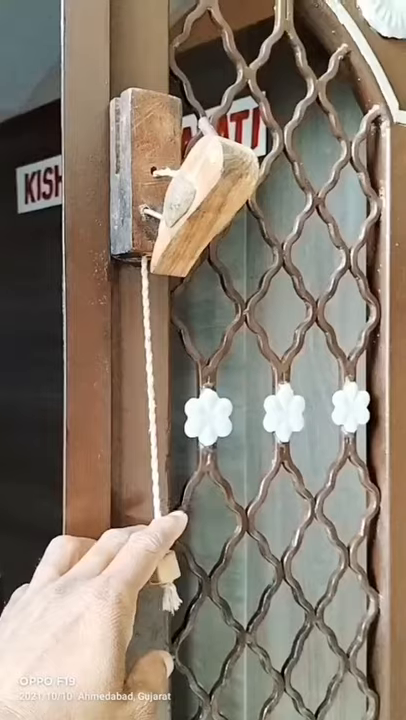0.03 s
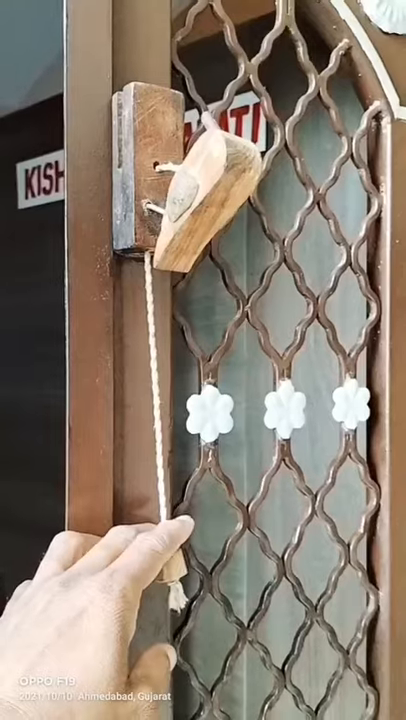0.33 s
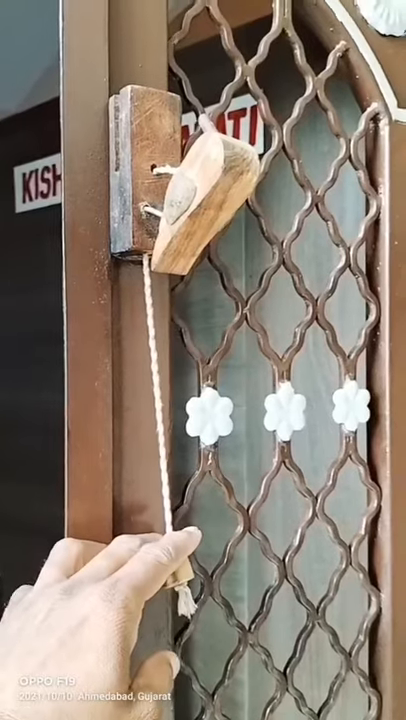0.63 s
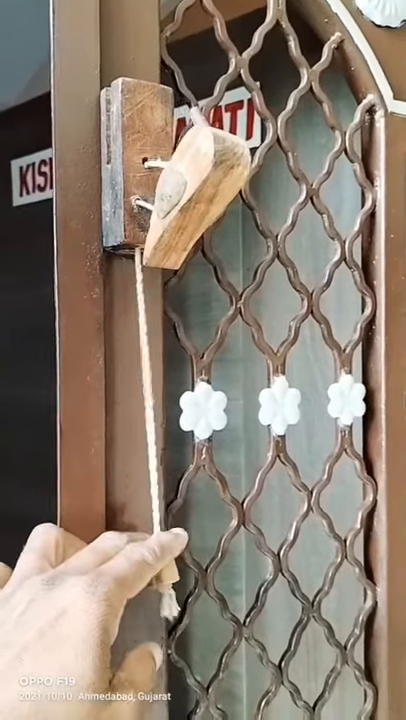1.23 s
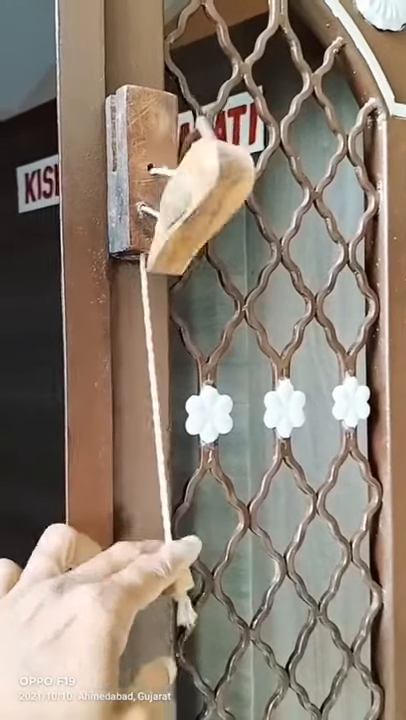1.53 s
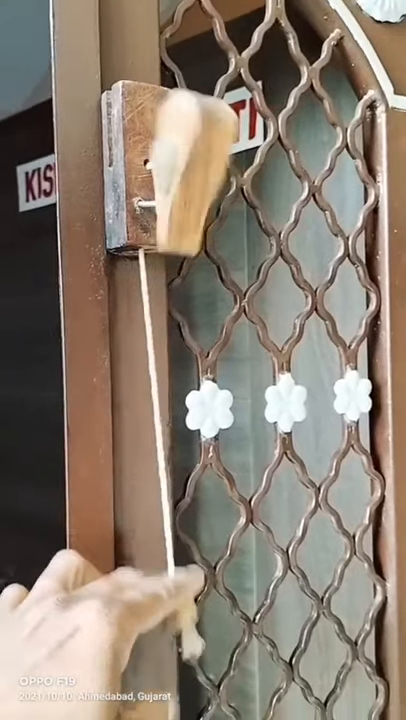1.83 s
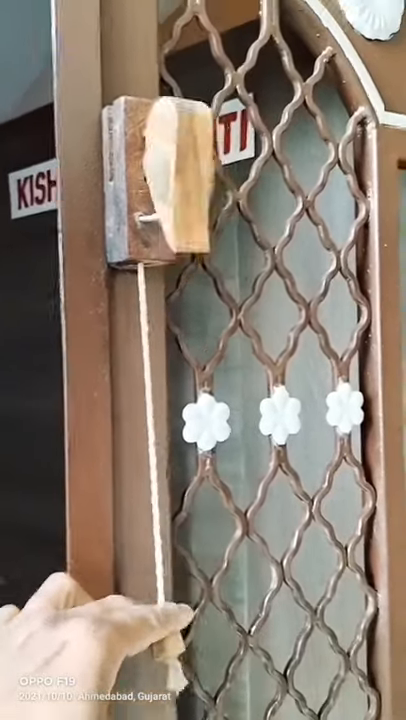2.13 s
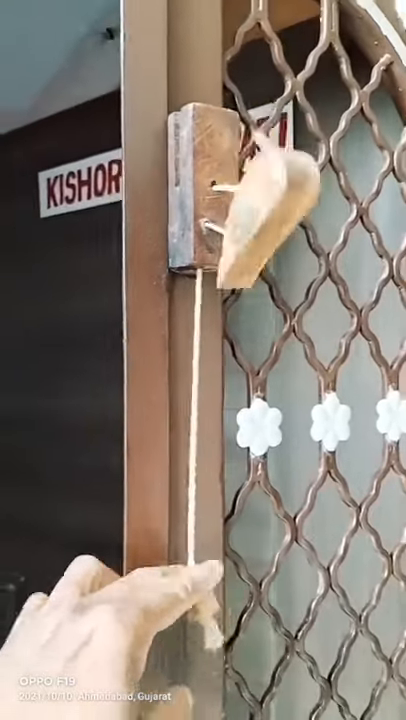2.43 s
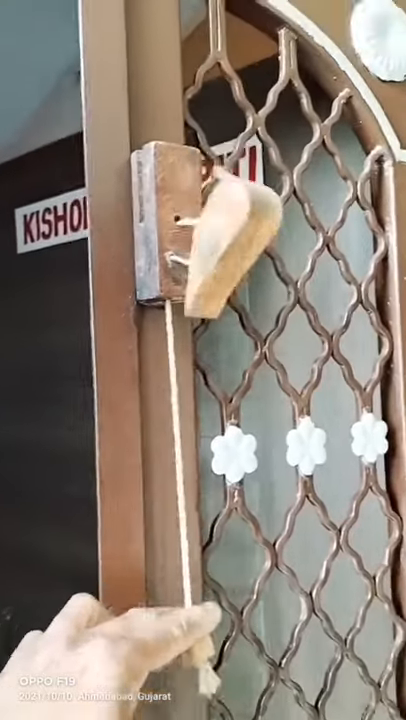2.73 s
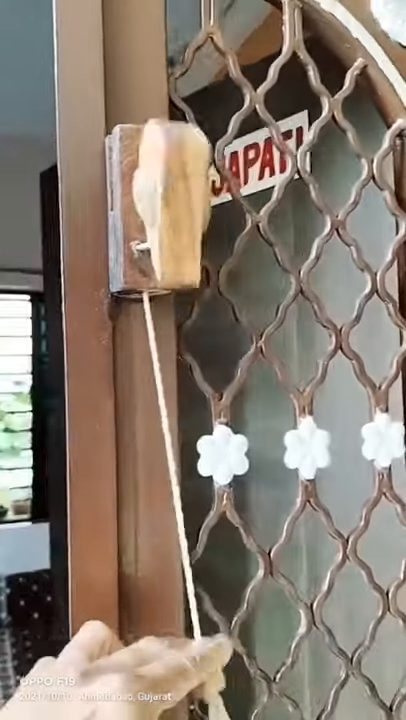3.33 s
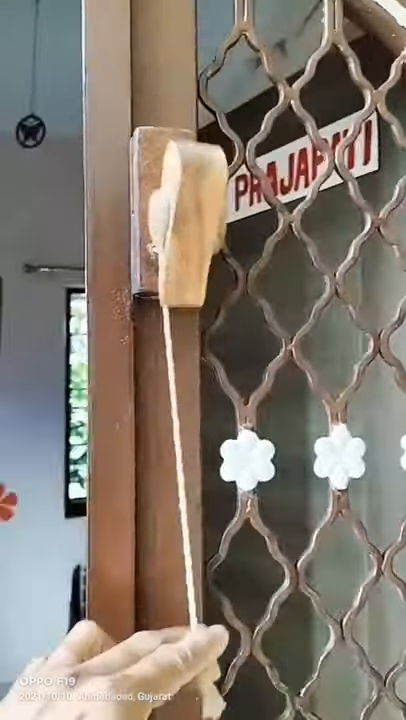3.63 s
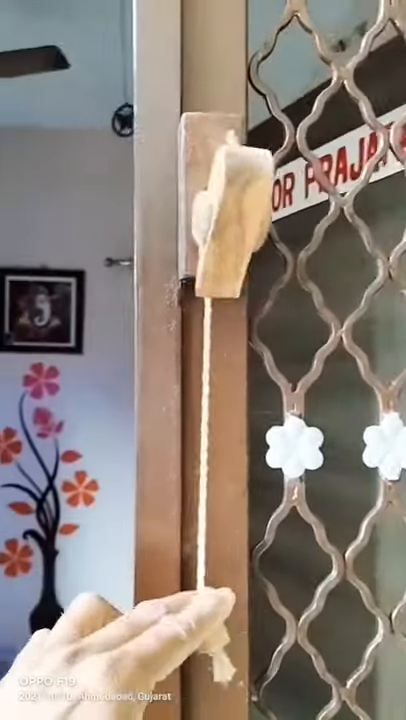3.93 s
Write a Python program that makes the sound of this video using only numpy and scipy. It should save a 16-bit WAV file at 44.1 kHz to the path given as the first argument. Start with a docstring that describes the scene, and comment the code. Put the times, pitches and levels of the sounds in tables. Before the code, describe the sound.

Sharp, echoing clacks of a wooden knocker repeat steadily against its block on a door.

```python
"""On a bare, echoing landing, a small wooden knocker pulled by a cord clacks eleven times
against its block on a door frame. Each blow gives a hard snap, sets the wood and the frame
ringing, and bounces off the walls. Behind it are a few faint chirps and the wash of distant
traffic. A phone close by picks it all up and rounds off the loudest peaks."""
import sys
import numpy as np
from scipy import signal
from scipy.fft import rfft, irfft
from scipy.io import wavfile
from scipy.ndimage import uniform_filter1d, minimum_filter1d

SR = 44100
rng = np.random.default_rng(int(sys.argv[2]) if len(sys.argv) > 2 else 0)


def unload_audio(sound):
    """Save the sound as a 16-bit wav file, at the path given as the first command line argument."""
    columns = np.transpose(np.atleast_2d(sound))
    # keep every value between -1 and 1, then stretch to whole-number steps
    steps = np.round(np.clip(columns, -1, 1) * 32767)
    wavfile.write(sys.argv[1], SR, steps.astype(np.int16))


N = 176400


def knocker():
    """Each blow snaps, ticks and rings the wood; the echoes shift as the phone moves."""
    # One row a blow; body means the ringing wood and its echoes, hollow the block's own note.
    # start_s, body_db, snap_db, bright_db_per_octave, hollow_db, tick_db, low_thud_db, damping_db_per_s
    blows = [(1.2546, -2.5, -4, 0.5, 5, -7, -12, 36), (1.5438, -1, 0.5, 0.5, 0, -3, 5, 4),
             (1.7861, 0, 1.5, 0, 0, 5, -1, 2), (2.0200, -1, 2.5, 1.2, 1.5, 2, 10, -2),
             (2.2290, 0, -0.5, 0.2, -1.5, 0.5, 0, 26), (2.4474, 1.5, -1, -1, -2.5, 0, -7, 3),
             (2.7091, 1, 0, 0, -1, -1.5, 6, 6), (2.9710, 2, 3, -0.5, -1, 6, 1, 21.5),
             (3.2698, -1, -1.5, 0.5, 1.5, -2.5, -2, -12), (3.5889, -3.5, 2, 1.5, 1.5, -1.5, -5, -16),
             (3.9422, -3.5, 3.5, 1.2, 6, 0.5, 2, 3)]
    t = np.arange(32768) / SR
    hz = np.fft.rfftfreq(len(t), 1 / SR)
    octaves = np.log2(np.clip(hz, 800, 5000) / 2000)
    block_hz, block_width_hz = 1027, 310
    block_note = 1 / (1 + ((hz - block_hz) / block_width_hz) ** 2)
    spots, near_samples = 4, 16384  # the phone passes four spots, each with its own echoes
    echoes = landing_echo(t, spots)
    echoes[:, :near_samples] += near_echoes(t[:near_samples], spots)
    wood, snap, ticks = ringing_wood(t), contact_snap(t), edge_ticks(len(blows))
    # A brief low thud in the phone's sound with each blow.
    low_thud = ring(t, pitch_hz=48, level_db=-50, fade_s=0.083)
    places = np.linspace(0, spots - 1, len(blows))
    out = np.zeros(N)
    for blow, place, tick in zip(blows, places, ticks):
        start_s, body_db, snap_db, bright, hollow_db, tick_db, low_thud_db, damping = blow
        nearness = np.sqrt(np.maximum(0, 1 - abs(np.arange(spots) - place)))
        note_gains = undb(rng.standard_normal(len(wood)))  # each note varies by about 1 dB
        body = note_gains @ wood + nearness @ echoes
        tone = undb(body_db + bright * octaves + hollow_db * block_note)
        body = taper(irfft(rfft(body) * tone)) * undb(-damping * t)
        add(out, start_s, undb(snap_db) * snap + undb(low_thud_db) * low_thud + body)
        add(out, start_s, undb(tick_db) * tick)
    return out


def ringing_wood(t):
    """Struck wood rings at its own set of notes: one row each, starting at slightly different times."""
    # Notes of the knocker, block and frame: pitch_hz, level_db, fade_s
    notes = [(491.7, -33, 0.45), (720, -32, 0.217), (789, -30.5, 0.3), (955.2, -23.5, 0.26),
             (1010, -20, .24), (1065, -26, 0.29), (1102, -20, 0.18), (1210, -29, 0.31), (1274, -39.5, 0.61),
             (1519.6, -22.5, 0.21), (1735, -14.5, 0.12), (2470, -20.5, 0.2), (2455, -21.5, 0.1),
             (2832, -22.5, 0.31), (3057, -25, 0.17), (3620, -16, 0.067), (3790, -30.5, 0.45),
             (4180, -23, 0.26)]
    rise_s = 0.005017
    delays_s = rng.uniform(0, rise_s, len(notes))
    return np.array([ring(t - delay, *note) * rise(t - delay, rise_s)
                     for note, delay in zip(notes, delays_s)])


def contact_snap(t):
    """The hit itself, heard directly: a few notes that die almost at once."""
    # Notes of the snap: pitch_hz, level_db, fade_s
    notes = [(4070, 6, 0.0083), (3770, -32, 0.0067), (2644, -14, 0.0067), (1010, -17, 0.041)]
    return sum(ring(t, *note) for note in notes) * rise(t, rise_s=0.0011)


def edge_ticks(count):
    """Hard edges meet in a tiny burst of noise, one row for each blow."""
    # Tone of the tick: pitch_hz, level_db
    tone = [(2000, 8), (5500, -5), (8000, -4), (10000, -4.5), (11300, 1), (12200, 3.5), (13000, -13),
            (14000, -5)]
    t = np.arange(4096) / SR
    bursts = rng.standard_normal((count, len(t))) * fade(t, fade_s=0.0066)
    return undb(-19) * colour(bursts, tone)


def near_echoes(t, spots):
    """The door and near walls throw back a crowd of echoes, one row a spot; the treble dies first."""
    # How long the echoes last: pitch_hz, fade_s
    fade_times = [(300, 0.3), (1000, 0.32), (2400, 0.36), (4000, 0.24), (6000, 0.19), (12000, 0.11)]
    # Tone of the clack as the walls return it: pitch_hz, level_db
    tone = [(100, -27.5), (400, -28.5), (650, -14), (850, -13), (930, 4.5), (1220, 3), (1400, -7),
            (1620, -4.5), (1780, 2.5), (2050, -3.5), (2430, 6.5), (2790, -2), (2900, -7.5), (3120, 1),
            (3600, 0), (3950, 0.5), (4220, -3), (4650, -15), (5350, -18), (6200, -26), (9000, -28),
            (12500, -38), (14000, -54)]
    hz = np.fft.rfftfreq(len(t), 1 / SR)
    spectrum = rfft(rng.standard_normal((spots, len(t))))
    echoes = 0
    for band_hz, fade_s in fade_times:
        band = on_log(hz, [(pitch_hz, pitch_hz == band_hz) for pitch_hz, _ in fade_times])
        echoes = echoes + irfft(spectrum * band) * fade(t, fade_s)
    first_wall_s = 0.00026
    onset = rise(t - first_wall_s, rise_s=0.00095)
    echoes = even(echoes * onset, size=41) * onset
    return undb(-8.5) * colour(taper(echoes), tone)


def landing_echo(t, spots):
    """The bare landing fills with a long echo that swells and dies away, one row a spot."""
    # Tone of the long echo: pitch_hz, level_db
    tone = [(200, -2.5), (700, -11.5), (1050, 5.5), (1500, -4), (2400, 13.5), (3000, 6), (4100, 6.5),
            (4800, -15.5), (7000, -69.5), (12000, -46)]
    burst = even(rng.standard_normal((spots, len(t))) * fade(t, fade_s=0.75), size=81)
    return undb(-28) * colour(taper(burst) * rise(t, rise_s=0.036), tone)


def chirps():
    """Short far-off whistles, probably a bird, smeared by the landing's echo."""
    # Falling whistles: start_s, length_s, start_hz, end_hz, level_db
    whistles = [(0.622, 0.081, 3379, 3344, -46.5), (.69, 0.098, 3170, 2965, -44),
                (.755, 0.097, 2236, 2050, -45.5)]
    out, t = np.zeros(N), np.arange(SR) / SR
    for start_s, length_s, start_hz, end_hz, level_db in whistles:
        n = int(length_s * SR)
        pitch_hz = np.linspace(start_hz, end_hz, n)
        note = np.sin(2 * np.pi * np.cumsum(pitch_hz) / SR) * signal.windows.tukey(n, .5)
        echo = signal.fftconvolve(note, rng.standard_normal(SR) * fade(t, fade_s=.6))
        add(out, start_s, undb(level_db) * echo / abs(echo).max() * 2.0)
        add(out, start_s, undb(level_db) * note * .5)
    return out


def traffic():
    """Distant traffic blurs into a wash of noise whose lows and highs swell separately."""
    # Tone of the traffic: pitch_hz, level_db
    tone = [(30, -21.5), (100, -17.5), (145, -7), (265, -2.5), (370, -6), (560, -8.5), (760, -5.5),
            (1150, -2), (1600, -8.5), (2200, -12), (2550, -11), (3100, -15), (3900, -13), (5000, -21.5),
            (6000, -28), (8000, -44.5), (10000, -51.5), (13000, -50)]
    # Its loudness over time: time_s, lows_db, highs_db
    swells = [(.4, -38.5, -40), (.6, -38.5, -40.5), (.64, -46, -43.5), (1.0, -44.5, -48.5),
              (1.5, -45, -44.5), (2.3, -44.5, -42), (2.801, -40, -44.5), (3.199, -39.5, -41),
              (3.5, -44, -45), (3.85, -42.5, -45), (4, -43.5, -43)]
    time_s, lows_db, highs_db = np.array(swells).T
    split_hz, flicker_db = 890, 0.5
    t = np.arange(N) / SR
    noise = colour(rng.standard_normal(N), tone)
    out = 0
    for kind, level_db in (("low", lows_db), ("high", highs_db)):
        band = signal.sosfilt(signal.butter(3, split_hz, kind, fs=SR, output="sos"), noise)
        flicker = np.interp(t, np.linspace(0, N / SR, 60), rng.standard_normal(60))
        out = out + unit(band) * undb(np.interp(t, time_s, level_db) + flicker_db * flicker)
    return out


def ring(t, pitch_hz, level_db, fade_s):
    """One pure note that dies away."""
    return undb(level_db) * fade(t, fade_s) * np.sin(2 * np.pi * pitch_hz * t)


def fade(t, fade_s):
    """Die away, dropping 60 dB in fade_s seconds."""
    return np.exp(-np.log(1000) * t / fade_s)


def rise(t, rise_s):
    """Grow smoothly from silence."""
    return 1 - np.exp(-(np.maximum(t, 0) / rise_s) ** 2)


def taper(x):
    """Fade the second half of each row to silence."""
    return x * np.minimum(1, np.linspace(2, 0, x.shape[-1])) ** 2


def colour(x, tone, size=4096):
    """Filter each row to a tone; the table sets the balance of pitches, not the overall loudness."""
    cepstrum = irfft(np.log(undb(on_log(np.fft.rfftfreq(size, 1 / SR), tone))))
    # Fold onto the first half so the filter never sounds ahead of its input.
    cepstrum[1:size // 2] *= 2
    cepstrum[size // 2 + 1:] = 0
    response = irfft(np.exp(rfft(cepstrum)))
    response /= np.linalg.norm(response)
    n = x.shape[-1]
    return irfft(rfft(x) * rfft(response, n), n)


def even(x, size):
    """Smooth out the chance peaks in the tone of each noise burst, keeping its energy."""
    spectrum = rfft(x)
    power = uniform_filter1d(abs(spectrum) ** 2, size)
    return irfft(spectrum * np.sqrt(power.mean() / power))


def on_log(hz, points):
    """Read between (pitch_hz, value) points, with octaves evenly spaced."""
    pitch_hz, values = np.array(points, float).T
    return np.interp(np.log(np.maximum(hz, 1)), np.log(pitch_hz), values)


def undb(db):
    """Turn decibels into a multiplier."""
    return 10 ** (np.asarray(db) / 20)


def unit(x):
    """Scale to an average power of 1."""
    return x / np.sqrt(np.mean(x ** 2))


def add(out, start_s, x):
    """Mix x into out at start_s."""
    i = int(round(start_s * SR))
    out[i:i + len(x)] += x[:N - i]


def scene():
    """Knocker, chirps and traffic reach left and right alike."""
    return np.tile(knocker() + chirps() + traffic(), (2, 1))


def record(dry):
    """After a moment of silence, the phone briefly turns down each loud peak and cuts the top treble."""
    ceiling, span_samples = undb(-3.2), 88
    silent_s, top_hz = .396, 13700
    gain = np.minimum(1, ceiling / (abs(dry[0]) + 1e-9))
    gain = uniform_filter1d(minimum_filter1d(gain, span_samples), span_samples)
    opened = np.arange(N) / SR > silent_s
    treble_cut = signal.ellip(8, .2, 70, top_hz, fs=SR, output="sos")
    return signal.sosfilt(treble_cut, dry * gain * opened)


dry = scene()
out = record(dry)
unload_audio(out)
```